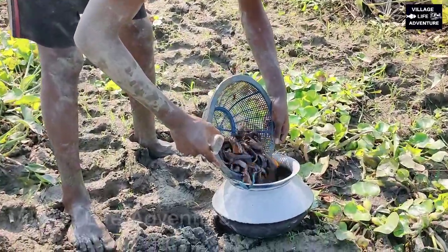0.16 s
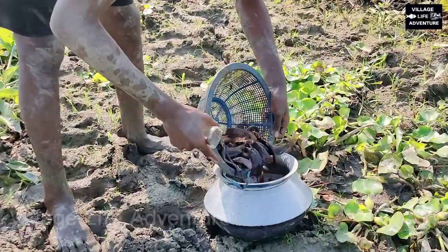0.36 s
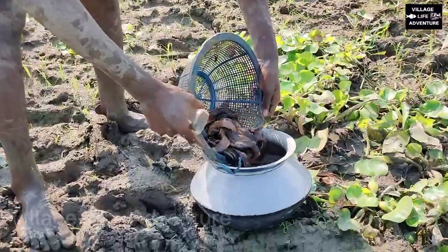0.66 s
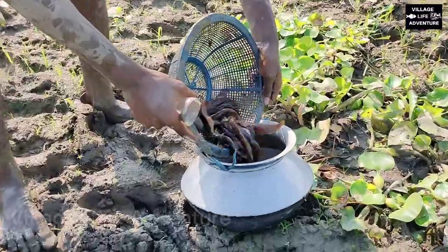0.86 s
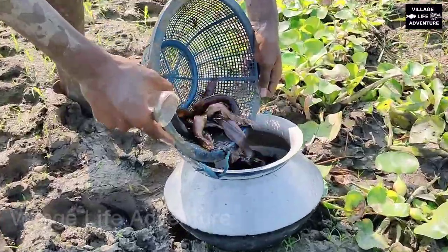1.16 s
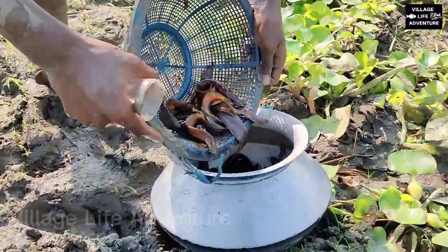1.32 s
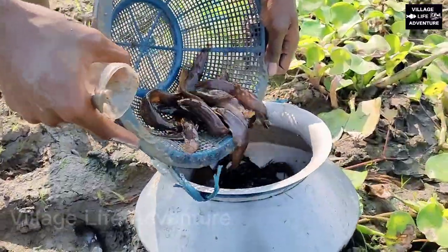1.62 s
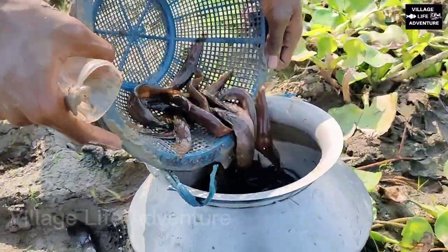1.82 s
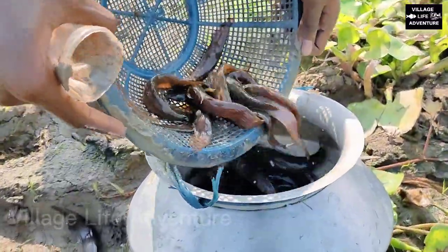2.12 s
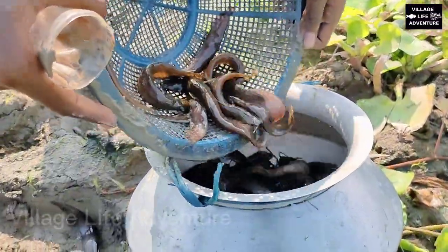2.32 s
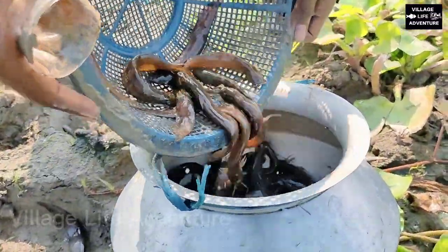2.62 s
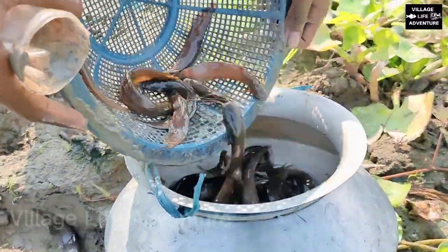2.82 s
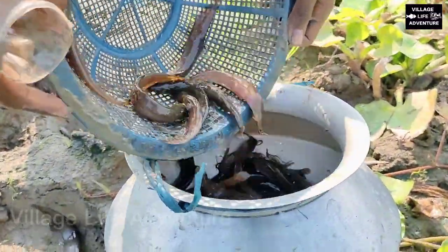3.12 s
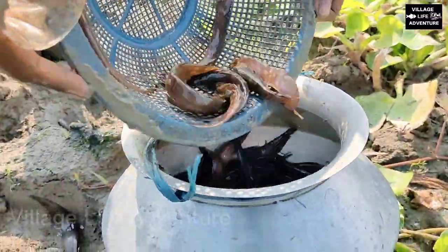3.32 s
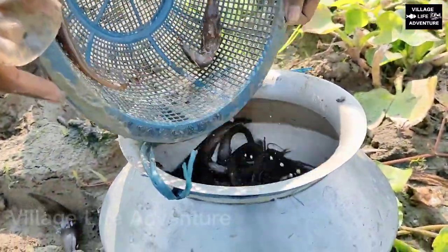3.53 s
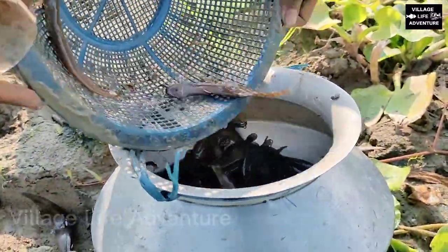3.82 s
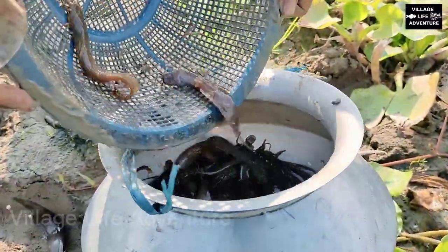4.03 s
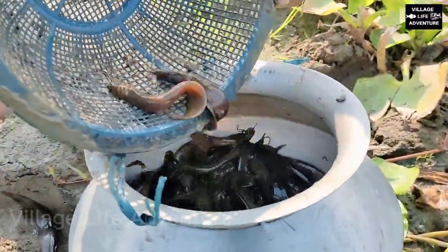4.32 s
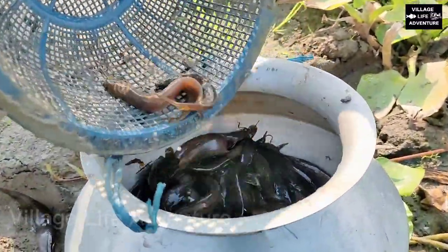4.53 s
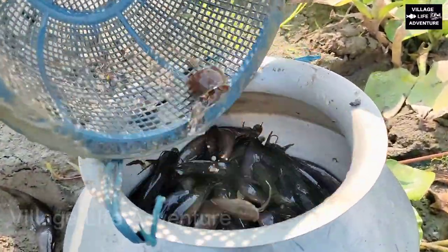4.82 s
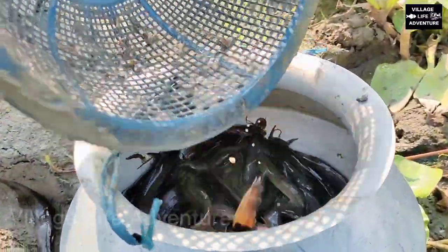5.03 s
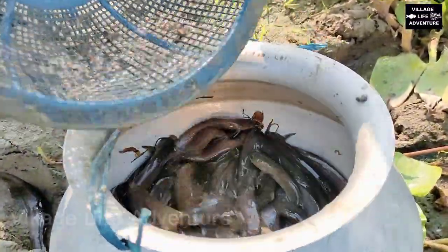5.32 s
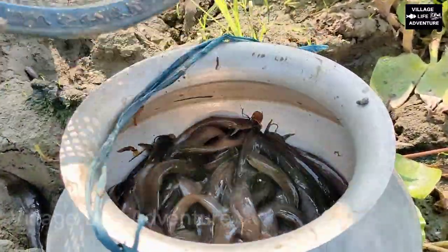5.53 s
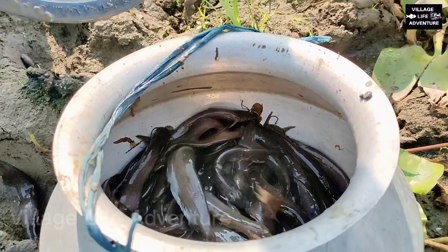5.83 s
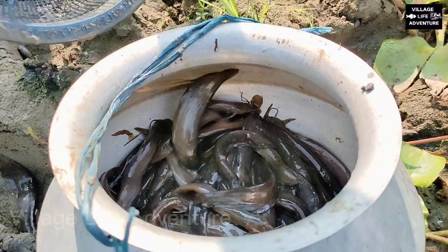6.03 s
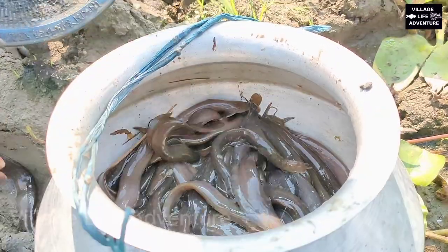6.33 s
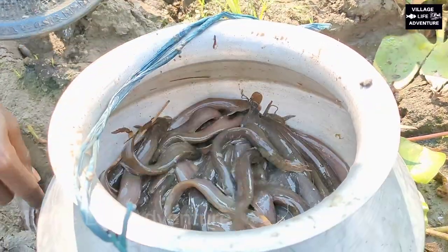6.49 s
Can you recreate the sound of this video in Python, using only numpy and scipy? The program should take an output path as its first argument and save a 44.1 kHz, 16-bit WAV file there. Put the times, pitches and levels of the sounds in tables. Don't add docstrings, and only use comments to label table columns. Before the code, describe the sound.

Live fish slither from a plastic basket into a metal pot with sharp wet slaps, spray and gurgles, while distant pump engines throb outdoors.

```python
import sys
import numpy as np
from scipy import signal
from scipy.io import wavfile
from scipy.ndimage import uniform_filter1d

SR = 44100
rng = np.random.default_rng(int(sys.argv[2]) if len(sys.argv) > 2 else 0)


def rack_gain(trim_db):
    fader = np.asarray(trim_db, float)
    return 10 ** (fader / 20)


def unload_audio(sound):
    columns = np.transpose(np.atleast_2d(sound))
    steps = np.round(np.clip(columns, -1, 1) * 32767)
    wavfile.write(sys.argv[1], SR, steps.astype(np.int16))


N = 293573
POT_FULL_S = 2.95


def evened(x):
    return x / np.sqrt(np.mean(x ** 2) + 1e-20)


def read(points, hz):
    f, value = np.transpose(points)
    return np.interp(np.log(hz + 1), np.log(f + 1), value)


def curves(rows):
    s, *columns = np.transpose(rows)
    return [np.interp(np.arange(N) / SR, s, c) for c in columns]


def add(mix, s, sound):
    part = mix[..., round(s * SR):][..., :sound.shape[-1]]
    part += sound[..., :part.shape[-1]]


def band(x, lo_hz, hi_hz):
    sos = signal.butter(2, [lo_hz, min(hi_hz, .45 * SR)], "band", fs=SR, output="sos")
    return signal.sosfilt(sos, x) * np.sqrt(SR / 2 / (hi_hz - lo_hz))


def sides(pan_db):
    return rack_gain(np.array([pan_db / 2, -pan_db / 2]))


def air(colour, likeness, patchy_db):
    # f/Hz, likeness (0 to 1)
    port_likeness = [(60, 0.81), (130, 1), (300, 0.66), (700, 0.79), (1400, 0), (16000, 0.13)]
    frames, hz = N // 512 + 5, np.fft.rfftfreq(2048, 1 / SR)
    a, b, c, d, patches = rng.standard_normal((frames, 1025, 5)).T
    patches = evened(uniform_filter1d(uniform_filter1d(patches, 16, 0), 5, 1))
    same = np.clip(likeness * read(port_likeness, hz), -1, 1)[:, None]
    left = a + 1j * b
    right = same * left + np.sqrt(1 - same ** 2) * (c + 1j * d)
    z = np.array([left, right])
    z *= rack_gain(read(colour, hz)[:, None] + patchy_db * patches)
    return evened(signal.istft(z, nperseg=2048, noverlap=1536)[1][:, :N])


def open_field():
    # f/Hz, level/dB per Hz
    field_colour = [(100, 8), (270, 14), (750, 4.5), (1600, 0.5), (4000, -3.5), (9000, 2), (15000, -5.5)]
    return rack_gain(-56.5) * air(field_colour, 1, patchy_db=1.2)


def pump(firings, db, hz, spread_s, uneven_db):
    at = np.flatnonzero(np.diff(np.floor(curves(firings)[0]))) + 1
    uneven = np.clip(rng.standard_normal(100), -2, 1.3)[:len(at)]
    train = np.zeros(N)
    train[at] = rack_gain(db + uneven_db * uneven)
    t = np.arange(-1500, 1501) / SR
    thump = np.exp(-.5 * ((t + 0.0013) / spread_s) ** 2) * np.cos(2 * np.pi * hz * t)
    return signal.oaconvolve(train, thump, "same")


def pumps():
    # t/s, firings so far
    near_firings = [(-.296, 0), (2.974, 42), (6.688, 90)]
    # t/s, firings so far
    far_firings = [(-.078, 0), (2.135, 30), (4.619, 64), (6.727, 93)]
    # f/Hz, level/dB per Hz
    drone_colour = [(30, -7), (60, -38), (85, 2), (120, -2), (165, -1.5), (200, -19), (240, -49),
                    (400, -30)]
    near = pump(near_firings, -32.5, 133.7, 0.004, uneven_db=3.5)
    far = pump(far_firings, -38.0, 98.0, 0.0046, uneven_db=7.0)
    opposed = rack_gain([[-.4], [.4]])
    return (near + far) * opposed + rack_gain(-47.0) * air(drone_colour, 0.96, patchy_db=-2.5)


def birds():
    # t/s, length/s, from f/Hz, to f/Hz, level/dB, width/Hz
    calls = [
        (5.763, .022, 3450, 3520, -56, 30),
        (5.788, .02, 3500, 3450, -55, 30),
        (5.809, .028, 3410, 3390, -54, 30),
        (1.7, .18, 1390, 1350, -59, 150),
        (2.1, .17, 1290, 1320, -58, 220),
    ]
    out = np.zeros(N)
    for s, length, from_hz, to_hz, db, width_hz in calls:
        n = round(length * SR)
        husk = uniform_filter1d(rng.standard_normal(20000), max(round(SR / width_hz / 2), 1))[:n]
        tone = np.sin(2 * np.pi * np.cumsum(np.linspace(from_hz, to_hz, n)) / SR)
        husky = evened(tone * (1 + width_hz / 100 * evened(husk)))
        add(out, s, rack_gain(db) * husky * signal.windows.tukey(n, .4))
    return out


def wind():
    # t/s, level/dB, left-right/dB
    gusts = [(0.0, -51, -11), (0.31, -41.5, 10.5), (0.39, -50.5, 2), (1.63, -54.5, 4), (1.95, -60, 13),
             (2.28, -47, -9), (2.74, -38, 8), (2.91, -39, -1), (3.67, -49, -4), (3.82, -53, 1),
             (5.73, -51.5, -5), (6.66, -54, -2)]
    # f/Hz, level/dB per Hz
    gust_colour = [(10, 3.5), (40, -9), (80, -9), (160, -22.5), (400, -34), (1200, -40), (3000, -83)]
    db, pan_db = curves(gusts)
    lumps = evened(uniform_filter1d(rng.standard_normal((2, N)), 1500))
    return rack_gain(db + 6.0 + 2.0 * lumps) * sides(pan_db) * air(gust_colour, 0.29, patchy_db=1.5)


def pot_ring(drive):
    # f/Hz, level/dB, t60/s
    wall_modes = [(335, 1, 0.12), (588, 4, 0.04), (860, -1.5, 0.1), (1210, -22, 0.31), (1500, -23, 0.25),
                  (2070, 6, 0.067), (2560, -3, 0.049)]
    t = np.arange(round(.3 * SR)) / SR
    modes = sum(rack_gain(db - 60 * t / t60) * np.sin(2 * np.pi * hz * t) for hz, db, t60 in wall_modes)
    return signal.oaconvolve(drive, modes / np.linalg.norm(modes))[:N]


def rim():
    # t/s, level/dB
    nudges = [(3.38, -54), (3.61, -52.5), (3.79, -52), (3.97, -53), (4.14, -53), (4.52, -55),
              (4.548, -42.5), (4.625, -44), (4.8, -48), (4.897, -49.5), (4.95, -48.5), (5.0, -52),
              (5.13, -59), (5.18, -50), (5.46, -51), (5.66, -58), (5.87, -57), (5.93, -58)]
    rim_hz, beat_hz, t60_s = 888, 11.4, .5
    t, out = np.arange(round(.5 * SR)) / SR, np.zeros(N)
    pair = np.sin(2 * np.pi * rim_hz * t) + 0.38 * np.sin(2 * np.pi * (rim_hz + beat_hz) * t)
    for s, db in nudges:
        add(out, s, rack_gain(db - 60 * t / t60_s) * (1 - np.exp(-t / 0.0028)) * pair)
    damping = evened(uniform_filter1d(rng.standard_normal(N), 600))
    out = out * rack_gain(-5 + 3.5 * damping)
    return np.array([out, np.roll(out, -6)])


def knocks():
    # t/s, peak level/dB, centre f/Hz, thud
    # t60/s
    basket_blows = [(.047, -34, 285, 0.025), (.133, -28, 644, 0.038), (.53, -37, 1120, 0.019),
                    (.664, -29, 328, 0.029), (.906, -22, 1900, 0.013), (1.81, -39, 2290, 0.059),
                    (1.985, -41.5, 299, 0.028), (2.073, -40.5, 1893, 0.028), (2.281, -30, 1200, 0.018),
                    (2.402, -35, 860, 0.022), (2.49, -20, 483, 0.016), (2.506, -35, 491, 0.095),
                    (2.591, -26.5, 734, 0.012), (2.689, -44, 846, 0.044), (2.764, -30, 245, 0.06),
                    (1.0975, -24.5, 2460, 0.012), (1.1735, -18.5, 1930, 0.014)]
    # t/s, peak level/dB, centre f/Hz, thud t60/s
    pot_blows = [(3.384, -39, 330, 0.035), (3.615, -30, 2500, 0.037), (3.705, -45, 1110, 0.1),
                 (3.723, -38.5, 311, 0.054), (4.077, -46, 1300, .04), (4.435, -42, 990, 0.029),
                 (5.845, -45, 1200, 0.015), (4.613, -31, 299, 0.027), (4.816, -33.5, 1415, 0.056),
                 (5.011, -38, 1740, 0.039), (5.107, -33.5, 356, 0.021), (5.395, -49, 590, 0.05),
                 (5.527, -37.5, 528, .031), (3.973, -20, 3340, 0.018), (5.903, -36.5, 3280, 0.13),
                 (3.402, -31.5, 3030, 0.046)]
    t, thuds = np.arange(round(.15 * SR)) / SR, np.zeros(N)
    blows = basket_blows + pot_blows
    chance = rng.standard_normal((len(blows), len(t)))
    for (s, db, hz, t60), noise in zip(blows, chance):
        fall = rack_gain(db - 60 * t / np.clip(t60, .008, .3)) * (1 - np.exp(-t * hz))
        tone = 1.57 / (1 + (hz / 1900) ** 2) * np.sin(2 * np.pi * hz * t)
        add(thuds, s, fall * (tone + 1.13 * band(noise, 0.69 * hz, 1.69 * hz)))
    ring = pot_ring(thuds * (np.arange(N) > POT_FULL_S * SR))
    return thuds * rack_gain([[.6], [-.6]]) + rack_gain(-20.0) * np.array([ring, np.roll(ring, -6)])


def bubbles():
    # t/s, peak level/dB, start f/Hz, t60/s
    clear_bubbles = [(.891, -35, 1750, .03), (.959, -36, 1330, 0.036), (1.009, -38, 1300, 0.037),
                     (1.028, -31, 2000, .02), (1.085, -24, 2880, 0.014), (1.2, -36, 1500, 0.044),
                     (1.334, -39, 1520, 0.052), (1.38, -35, 1280, .05), (1.5118, -27.5, 3300, .02),
                     (2.875, -38, 2130, .03), (2.976, -35, 785, 0.032), (2.992, -32, 840, 0.057),
                     (2.997, -30, 1640, .03), (3.015, -24, 850, .08), (3.027, -31, 2000, .05),
                     (3.03, -38.5, 3260, .05), (3.039, -29, 1087, 0.037), (3.073, -31, 905, .07),
                     (3.085, -29, 1560, 0.035), (3.092, -28, 1990, 0.036), (3.1, -22, 1970, 0.032),
                     (3.117, -36, 3350, 0.048), (3.13, -37, 2030, 0.05), (3.153, -31, 1960, 0.075),
                     (3.155, -40.5, 2520, 0.066), (4.55, -35.5, 2000, 0.034), (4.695, -31, 885, 0.042),
                     (4.703, -26, 1460, .03), (4.713, -28, 2500, .02), (4.734, -29, 1720, 0.033),
                     (4.743, -25, 2320, 0.041), (4.755, -32, 2800, .03), (4.829, -24, 3200, .015),
                     (4.832, -33, 1920, 0.034), (4.852, -32, 4500, 0.018), (4.916, -27.5, 4140, .03),
                     (5.01, -28, 1656, 0.038), (5.395, -44, 585, 0.032), (5.485, -38, 605, .04),
                     (5.527, -38, 534, 0.059), (5.529, -39, 1160, 0.044), (5.623, -35, 965, 0.024),
                     (5.725, -44, 2080, 0.026), (5.95, -43, 2100, .03)]
    rise_per_s = 2.2
    t, out = np.arange(round(.1 * SR)) / SR, np.zeros((2, N))
    wobbles = evened(uniform_filter1d(rng.standard_normal((60, 2, len(t))), 90))
    for (s, db, hz, t60), side, wobble in zip(clear_bubbles, rng.random(60), wobbles):
        tone = np.sin(2 * np.pi * hz * t * (1 + rise_per_s * t) + .8 * wobble)
        tone = tone * (1 - np.exp(-t * hz / 1.3))
        add(out, s, rack_gain(db - 60 * t / np.clip(t60, .008, .1)) * tone * sides(6 * (side - .5))[:, None])
    return out


def sloshes(heaps):
    edge_db, skew = 2.5, 0.89
    out, t = np.zeros((2, N)), np.arange(900) / SR
    for start, length, peak_db, from_hz, to_hz in heaps:
        chance = rng.random((70, 4))[:round(600 * length)]
        for when, size, scatter, side in chance:
            db = peak_db + edge_db * (2 * when ** skew - 1) ** 2
            f = from_hz * (to_hz / from_hz) ** when
            f = f * np.exp(.5 * (scatter - .4) + (scatter - .4) ** 3 / .3)
            chirp = np.sin(2 * np.pi * f * t * (1 + 9 * t)) * np.exp(-t * f / 1.95) * (1 - np.exp(-t * f))
            gains = rack_gain(db + 8 - 2.8 * size) * sides(8 * (side - .5))
            add(out, start + when * length, gains[:, None] * chirp)
    return out + rack_gain(-17.0) * pot_ring(out.mean(0))


def ticks():
    # t/s, peak level/dB, centre f/Hz
    spray_ticks = [(0.1346, -33, 6490), (0.2994, -38, 7060), (0.8294, -27, 7460), (1.1294, -31, 6900),
                   (1.2494, -26, 7750), (1.5589, -26, 7640), (2.3476, -35, 4880), (2.602, -26, 7110),
                   (2.7294, -33, 4660), (2.7744, -31, 4910), (2.9294, -24, 7310), (3.2894, -38, 6970),
                   (3.309, -27, 7670), (3.4022, -20, 3370), (3.5448, -33, 4550), (3.699, -27, 6660),
                   (3.7744, -21.5, 5000), (3.912, -37, 4750), (3.9444, -40, 7680), (4.0144, -28, 4670),
                   (4.1944, -33, 7130), (4.2273, -31, 7340), (4.3655, -32, 7490), (4.4294, -34, 7180),
                   (4.5744, -22, 7880), (4.6294, -27, 6650), (4.7644, -27, 6730), (4.8144, -16, 6940),
                   (5.0294, -37, 7200), (5.4094, -23, 5080), (5.4244, -30, 4340), (5.5273, -34, 8200),
                   (5.5428, -32, 6990), (5.7872, -36, 3480), (5.9144, -25, 7440), (5.9294, -27, 7110),
                   (6.1654, -40, 4620), (6.2294, -37, 6760), (6.3394, -38, 6070)]
    puff_s, puff_length_s, puff_db = 2.762, .024, -23.5
    t, out = np.arange(900) / SR, np.zeros((2, N))
    for (s, db, hz), noise in zip(spray_ticks, rng.standard_normal((len(spray_ticks), 2, len(t)))):
        add(out, s, band(noise * rack_gain(db - 9 - 60 * t / 0.029), 0.63 * hz, 1.4 * hz))
    push = np.hanning(round(puff_length_s * SR))
    ragged = evened(uniform_filter1d(rng.standard_normal((2, 2000)), 24))[:, :len(push)]
    add(out, puff_s, rack_gain(puff_db) * push * (1 + 0.36 * ragged))
    return out


def drips(activity_db):
    # t/s, peak level/dB, centre f/Hz
    clear_drops = [(0.4429, -33, 4490), (0.5564, -27, 7100), (0.9612, -28, 5900), (1.1894, -28, 4500),
                   (1.3069, -43, 7350), (1.415, -24.5, 6560), (1.5471, -29, 7400), (1.621, -26.5, 8200),
                   (1.8123, -35, 6440), (1.9735, -21, 11400), (3.3343, -29.5, 4270), (3.8167, -26, 5140),
                   (4.7217, -16, 7100), (4.84, -20, 7600), (5.5782, -29, 7010), (5.745, -32.5, 6770),
                   (5.992, -41, 8070), (6.0814, -39, 4600), (6.134, -46, 6980), (6.3074, -29, 7050),
                   (5.901, -17.5, 11800)]
    t, out = np.arange(700) / SR, np.zeros((2, N))
    when, size, pitch = rng.random((3, 520))
    when = when * (N - 1) / SR
    patter_db = activity_db[(when * SR).astype(int)] + 7 - 11 * size
    patter_hz = 2800 * np.exp(1.4 * pitch)
    rows = list(clear_drops) + list(zip(when, patter_db, patter_hz))
    for (s, db, hz), noise in zip(rows, rng.standard_normal((len(rows), 2, len(t)))):
        add(out, s, band(noise * rack_gain(db - 5.5 - 60 * t / 0.034), 0.84 * hz, 1.415 * hz))
    return out


def crackle(grain_db, grain_s, shared):
    behind_s = 4.45
    own, both = rng.standard_normal((2, N)), rng.standard_normal(N)
    share = np.clip(shared, 0, 1)
    left = np.where(np.arange(N) < behind_s * SR, np.roll(both, 3), np.roll(both, -8))
    noise = share * np.array([left, both]) + np.sqrt(1 - share ** 2) * own
    clumps = evened(uniform_filter1d(rng.standard_normal(N), max(round(grain_s * SR), 1)))
    return evened(noise * rack_gain(grain_db * clumps))


def slither():
    # t/s, effort level/dB
    effort = [(0.0, -40.5), (.26, -49), (.54, -43.5), (1.41, -36), (1.87, -44), (2.39, -41), (2.8, -38),
              (3.93, -45.5), (4.36, -44.5), (4.56, -38.5), (4.69, -30.5), (4.78, -34.5), (4.97, -46),
              (5.23, -44), (5.36, -45), (5.93, -55), (6.27, -40.5), (6.51, -51.5)]
    full_basket_db, emptying_s = 4, 0.91
    scrape_re_hiss_db, scrape_growth = -12, 0.25
    hiss_db, = curves(effort)
    fullness = np.exp(-(np.arange(N) / SR / emptying_s) ** 2)
    scrape_db = scrape_re_hiss_db + scrape_growth * (hiss_db + 35.5) + full_basket_db * fullness
    fine = band(crackle(grain_db=2.2, grain_s=.01, shared=.5), 3500, 9500)
    finest = band(crackle(grain_db=3, grain_s=.01, shared=.5), 9500, 16000)
    coarse = crackle(grain_db=2.5, grain_s=.012, shared=0.53)
    hiss = rack_gain(hiss_db - 11) * (fine + rack_gain(1.0) * finest)
    dull = band(coarse, 798, 4350) + rack_gain(-7.5) * band(coarse, 283, 1860)
    scrape = rack_gain(hiss_db + scrape_db) * dull
    return hiss + scrape + rack_gain(-31.0) * pot_ring(scrape[0]) + drips(hiss_db)


def slaps():
    # t/s, peak level/dB, flesh level/dB re peak, t60/s
    flops = [(0.62, -27.5, -10, 0.015), (0.769, -28.5, -5, 0.24), (0.9069, -24.5, -7, 0.028),
             (1.053, -20.5, -5.5, 0.015), (1.174, -15.5, -1, 0.011), (1.3344, -51, -16, 0.036),
             (1.4537, -17, -14, 0.053), (1.7155, -29, -13, 0.32), (2.4911, -19.5, -15.5, 0.15),
             (2.648, -19.5, -16, 0.039), (2.687, -25, -9.5, 0.069), (2.82, -21.5, -12, 0.078),
             (2.9847, -26, -7.5, 0.13), (3.116, -23, -8, 0.11), (3.6594, -24, -14, 0.084),
             (3.696, -31.5, -7.5, 0.36), (3.787, -20, -15.5, 0.099), (4.141, -17.5, -13, 0.041),
             (4.594, -23, -6, .039), (4.6131, -13.5, -10, 0.058), (4.661, -23.5, -5, 0.09),
             (4.7127, -22, -3, 0.1), (4.794, -11.5, -8.5, 0.17), (4.913, -27, -5, 0.12),
             (5.106, -26, -10.5, 0.085), (5.2376, -29.5, -8.5, 0.059), (5.6239, -15.5, -11.5, 0.025)]
    # t/s, peak level/dB, smack level/dB re peak, t60/s
    smacks = [(0.075, -14, -5, 0.059), (1.0855, -23, -11, 0.017), (1.0979, -10.5, -6, 0.018),
              (1.847, -28, -14, 0.015), (1.9083, -31, -17, 0.15), (2.0129, -23, 3.5, 0.04),
              (2.0613, -21, -8.5, 0.097), (2.1293, -32.5, -8, 0.18), (2.2924, -7, -3, 0.042),
              (2.802, -42, 7, 0.051), (3.4499, -29, 0, 0.098), (3.614, -33, 7, 0.053),
              (3.882, -41, 6.5, 0.059), (3.9714, -4.5, -11, 0.04), (4.0826, -27.5, -8, 0.029),
              (4.094, -24.5, 2.5, 0.073), (4.2564, -31.5, -3.5, 0.16), (4.5167, -28, -4, 0.1),
              (4.5395, -2, -24, 0.046), (4.901, -24.5, -9, 0.032), (5.28, -31, -7, 0.064),
              (5.3932, -25, -3.5, .17), (5.9003, -18.5, -7.5, 0.085), (5.9518, -21, -14, 0.026),
              (6.046, -32.5, -23, 0.028), (6.19, -12.5, 2, 0.05), (6.3872, -31, -3, .04)]
    # t/s, peak level/dB, fizz level/dB re peak, t60/s
    flicks = [(0.226, -25, -18, 0.02), (.72, -27, -19, 0.11), (0.978, -19, -14, 0.025),
              (1.225, -18, -46, 0.06), (2.18, -28, -10, .066), (2.1974, -19, -3.5, .045),
              (2.41, -16.5, -10, 0.1), (2.547, -13, -6, 0.064), (2.704, -15.5, -9, 0.032),
              (2.7526, -36.5, 1.5, 0.079), (2.8847, -18.5, -7, 0.029), (2.912, -11, -52, 0.026),
              (3.261, -22, -37, 0.04), (3.3782, -22, -8, .12), (3.498, -11, -10, 0.04),
              (4.328, -16, -12.5, 0.03), (4.477, -28.5, -11, .036), (4.6958, -23, 12, 0.019),
              (4.9746, -24.5, -14, 0.084), (4.996, -21.5, -16, .12), (5.1836, -20.5, -12.5, 0.099),
              (5.3019, -0.5, -21, 0.019), (5.454, -27, -0.5, 0.037), (5.4844, -24.5, -10, 0.063),
              (5.56, -26, -11.5, 0.072), (5.669, -26, -48, 0.037), (5.8809, -36, 1, 0.029),
              (6.2694, -23, -20, 0.11), (6.4276, -34, -2, 0.032), (6.538, -32, -20, 0.07)]
    flop_smack_db, flop_fizz_db = -7.5, -14.5
    smack_flesh_db, smack_fizz_db = -50, -19.5
    flick_flesh_db, flick_smack_db = -27.5, -59
    rows = [(s, db, own, flop_smack_db, flop_fizz_db, t60) for s, db, own, t60 in flops]
    rows += [(s, db, smack_flesh_db, own, smack_fizz_db, t60) for s, db, own, t60 in smacks]
    rows += [(s, db, flick_flesh_db, flick_smack_db, own, t60) for s, db, own, t60 in flicks]

    t = np.arange(round(.3 * SR)) / SR
    water = crackle(grain_db=2.5, grain_s=.001, shared=.7)
    body, smack, hiss, fizz = np.zeros((4, N))
    for s, db, body_db, smack_db, fizz_db, t60 in rows:
        t60 = np.clip(t60, .008, .4)
        first = np.sqrt(np.mean(water[1, round(s * SR):][:100] ** 2))
        crack = rack_gain(db - 13 - 170 * t60 - 60 * t / 0.008)
        falling_drops = rack_gain(db - 67.0 - 60 * t / 0.13)
        spray = crack + rack_gain(db - 60 * t / t60) + falling_drops
        spray = spray * (1 - np.exp(-t / (.1 * t60 ** 2))) / first
        add(body, s, (rack_gain(body_db) + rack_gain(-26)) * spray)
        add(smack, s, rack_gain(smack_db) * spray)
        add(hiss, s, spray)
        add(fizz, s, rack_gain(fizz_db) * spray)

    thump = rack_gain(-11.5) * band(body * water, 310, 1520)
    flesh = band(body * water, 1700, 3700)
    skin = band(band(smack * water, 4100, 5700), 4100, 5700)
    low = rack_gain([[-2], [-3]]) * flesh + rack_gain([[-14], [-14.5]]) * skin
    high = rack_gain([[-9], [-8]]) * band(hiss * water, 5730, 10030)
    high = high + rack_gain([[3], [2.5]]) * band(fizz * water, 9100, 13540)
    ring = pot_ring(thump[0] * (np.arange(N) > POT_FULL_S * SR))
    return thump + rack_gain(-19.5) * ring + low + high


def scene():
    # t/s, length/s, peak level/dB, gurgle from f/Hz, to f/Hz
    big_heaps = [(1.185, 0.043, -41.5, 1190, 1500), (2.497, 0.041, -44, 563, 457),
                 (2.751, 0.034, -45, 590, 600), (2.997, 0.059, -41.5, 900, 940),
                 (3.069, 0.11, -34.5, 1800, 2030), (4.701, .065, -42, 1260, 2800),
                 (4.795, 0.053, -40, 920, 1600), (5.399, 0.046, -33.5, 2900, 3280),
                 (1.372, 0.059, -43, 1390, 1500), (3.394, 0.041, -41, 2130, 2600),
                 (4.105, 0.05, -44, 2570, 2830)]
    # t/s, length/s, peak
    # level/dB, gurgle from f/Hz, to f/Hz
    more_heaps = [(.8, 0.086, -41, 2100, 2270), (1.225, .045, -43, 2500, 2700),
                  (2.52, 0.041, -53, 370, 330), (2.762, .028, -38.5, 1070, 1370),
                  (2.82, 0.034, -46, 1500, 1700), (3.022, 0.027, -34, 1480, 1750),
                  (5.92, .05, -49, 1940, 2200), (3.4, .05, -47, 2600, 3000),
                  (4.56, 0.059, -44.5, 1840, 2300), (3.9, .05, -50, 2250, 2500),
                  (2.3, 0.033, -46, 2300, 2200), (3.105, .07, -40, 3200, 3700), (2.55, .11, -48, 600, 900),
                  (2.85, .07, -47, 900, 1300), (4.63, .06, -47, 700, 1100), (1.5, .1, -49, 2200, 2600),
                  (4.53, .012, -38, 3000, 3300), (2.888, .015, -40, 2000, 2200)]
    far = open_field() + pumps() + birds() + wind()
    water = bubbles() + sloshes(big_heaps) + sloshes(more_heaps) + ticks()
    return far + rim() + knocks() + water + slither() + slaps()


def port(x, colour):
    gain = np.log(rack_gain(read(colour, abs(np.fft.fftfreq(4096, 1 / SR)))))
    taps = np.fft.ifft(np.exp(gain - 1j * signal.hilbert(gain).imag)).real[:2048]
    return signal.oaconvolve(x, taps)[:N]


def top_cut(x):
    return signal.sosfilt(signal.butter(12, 16480, fs=SR, output="sos"), x)


def record(dry):
    # f/Hz, level/dB
    left_colour = [(3000, -0.5), (4000, -1), (4700, 2.5), (6200, -6), (8800, -16.5), (10300, -5),
                   (11700, 0.5), (13200, -9.5), (15000, -24), (15600, -19), (16500, -61)]
    right_colour = [(3000, -0.5), (4000, -0.5), (4700, 3), (5800, 2), (7300, 9.5), (8600, 1.5),
                    (10300, -4.5), (12000, -4), (13000, -7.5), (15200, -4), (16500, -89)]
    x = np.clip([port(dry[0], left_colour), port(dry[1], right_colour)], -1, 1)
    edge = signal.firwin(255, 16500, window=("kaiser", 9), fs=SR)
    return top_cut(signal.oaconvolve(x, edge[None], "same"))


dry = scene()
out = record(dry)
unload_audio(out)
```